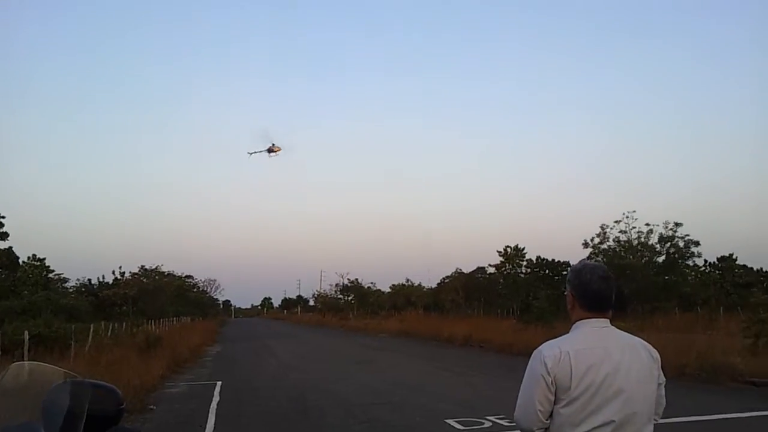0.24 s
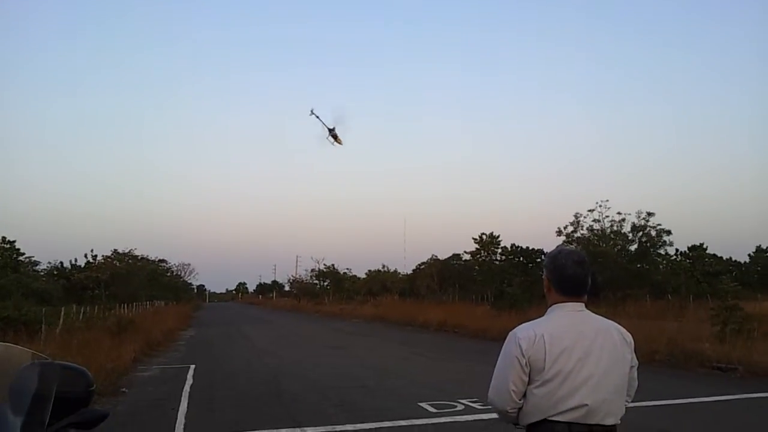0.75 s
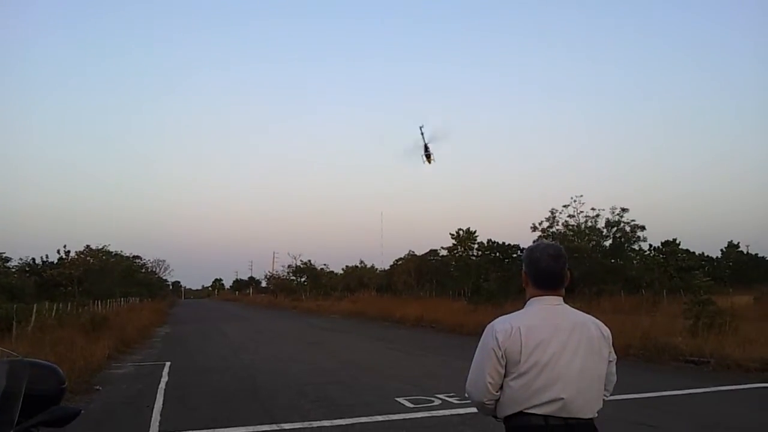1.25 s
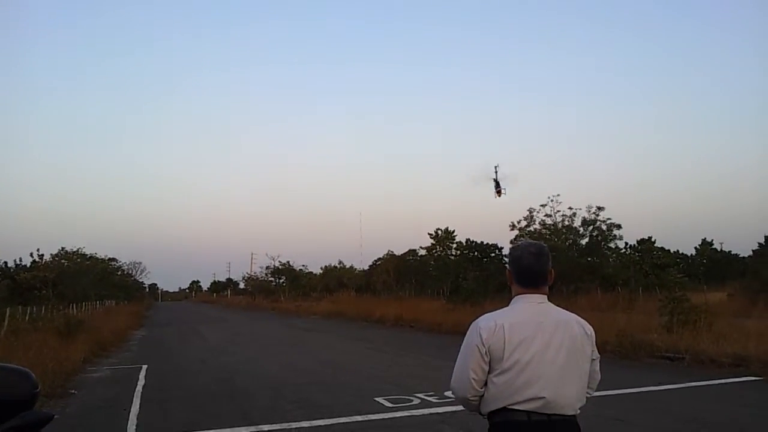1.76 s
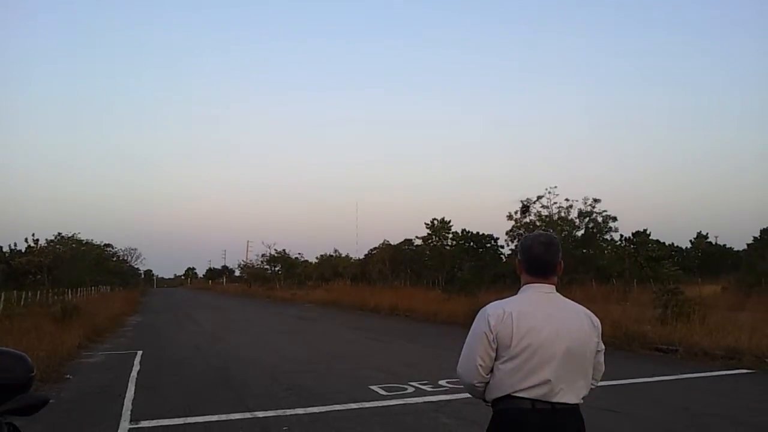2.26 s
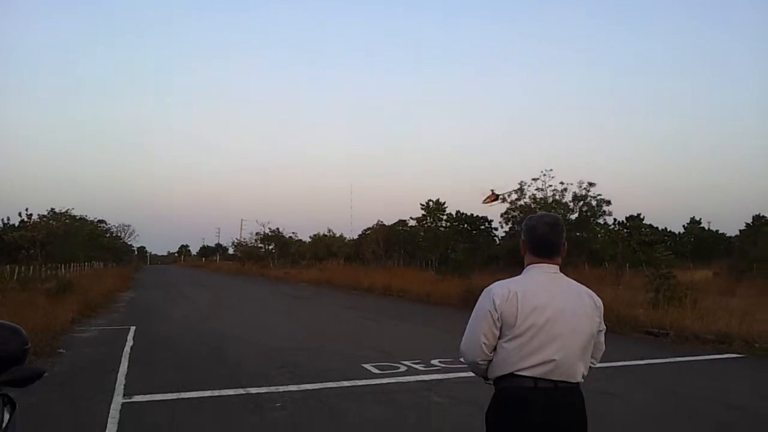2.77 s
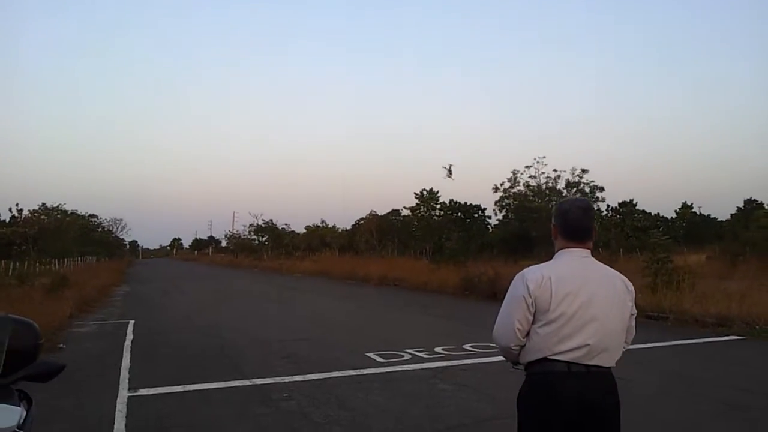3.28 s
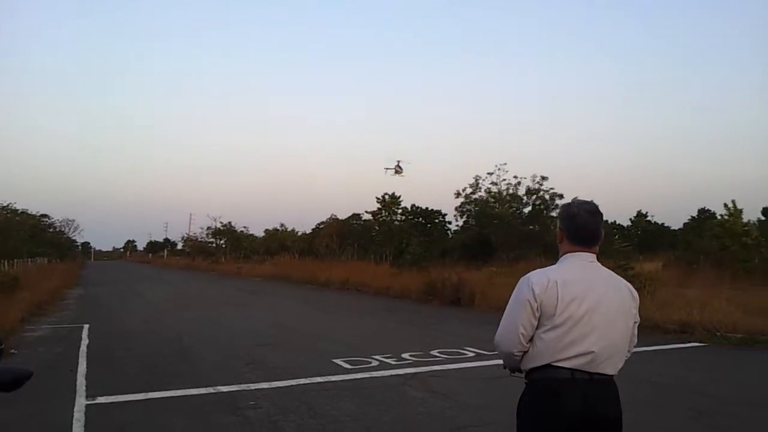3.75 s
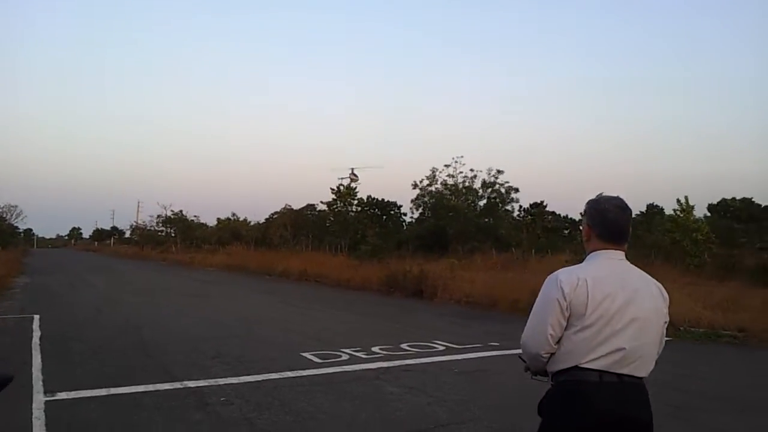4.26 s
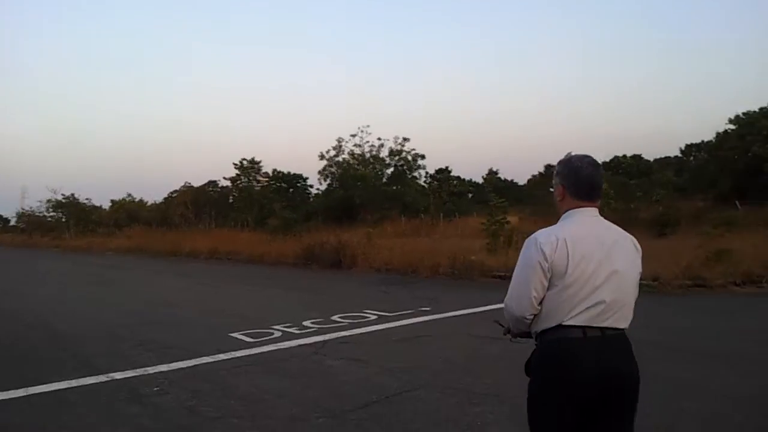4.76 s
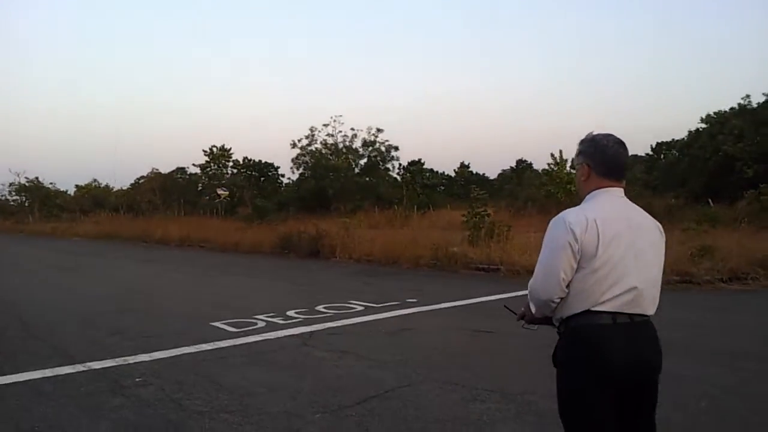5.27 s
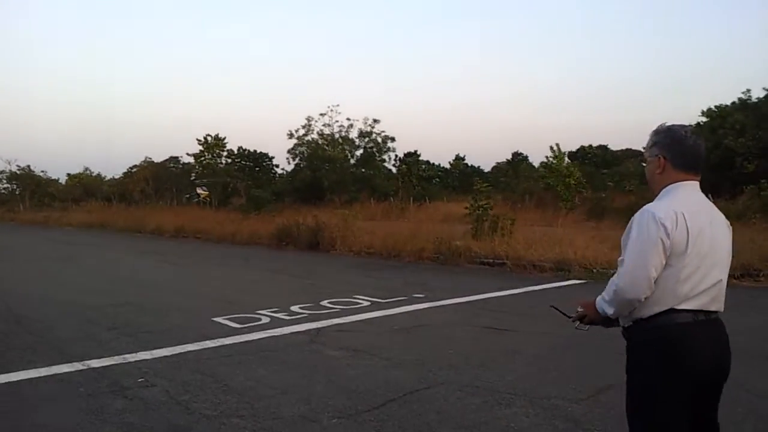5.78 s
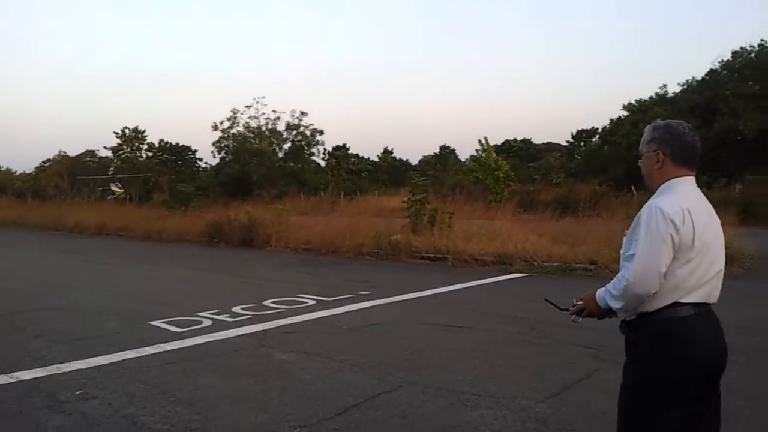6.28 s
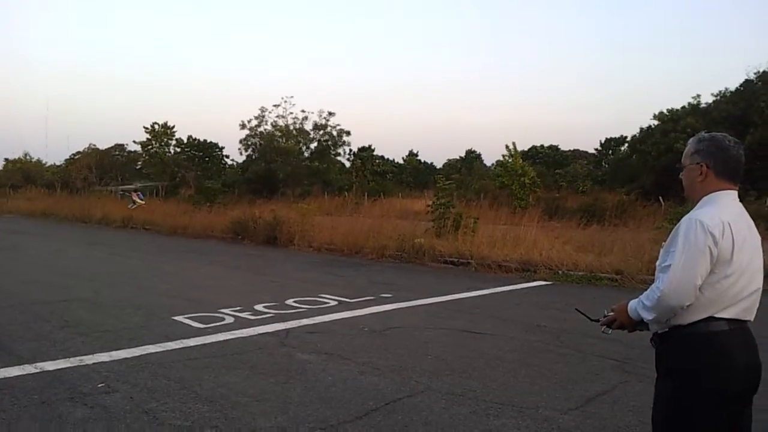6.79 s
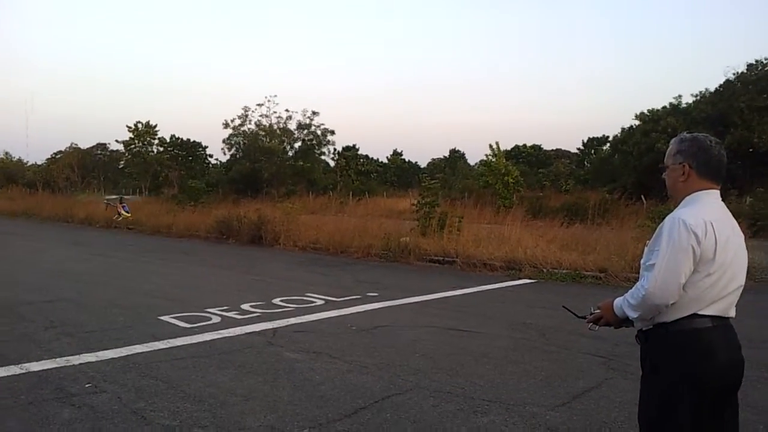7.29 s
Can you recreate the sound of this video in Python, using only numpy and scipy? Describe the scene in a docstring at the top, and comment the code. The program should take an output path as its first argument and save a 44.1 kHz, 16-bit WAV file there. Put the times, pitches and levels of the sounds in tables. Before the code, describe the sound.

A shrill electric motor-gear whine, throbbing rapidly, rides over chopped rotor noise and bright hiss from a small helicopter in flight. Close wind rumbles, thuds and slaps the two microphone ports unequally, distorting in bursts through most of the scene. The whine is strongest around one second, weaker around three and a half, stronger again near six. The last half second is nearly wind-free, in open air with a faint reflection off the ground.

```python
"""Electric model helicopter in gusty air

A small electric helicopter flies some metres off; wind thumps on two unlike microphone ports until they overload.
The main gear whines at its tooth rate and near twice that, as phasors throbbing with each rotor turn.
The tail drive sings lower, as phasors locked to a faster shaft; the blades hum on shaft harmonics and
hiss and chop as pulsed noise. Wind is band noise following gust levels, with sudden slaps and one scuff."""
import sys
import numpy as np
from scipy import signal
from scipy.fft import rfft, irfft, next_fast_len
from scipy.io import wavfile

SR = 44100
rng = np.random.default_rng(int(sys.argv[2]) if len(sys.argv) > 2 else 0)


def output_pcm(signal):
    """Save a mono or channel-first signal as 16-bit PCM at the path in sys.argv[1].

    Samples are clipped to [-1, 1] before scaling.
    """
    pcm = np.clip(np.atleast_2d(signal).T, -1, 1) * 32767
    wavfile.write(sys.argv[1], SR, np.round(pcm).astype(np.int16))


N = 332073

# breeze on the ports: t/s, level/dB, left minus right/dB
BREEZE_CURVE = [(0.02, -13.5, 6), (0.53, -30, 20), (0.76, -15, 13.5), (1.26, -22, -1), (1.32, -12.5, 4),
                (1.5, -4, 8), (1.65, -8, 5), (1.73, -18, 6), (1.87, -17, 17), (2.11, -17, 11),
                (2.3, -24, 18), (2.68, -20, 12), (2.8, -19, 0), (2.86, -11, 4), (2.96, -14, 17),
                (3.0, -34, 12), (3.05, -31, 8), (3.27, -14, 13), (3.56, -5.5, 2.5), (3.75, -20, 33),
                (4.15, -16.5, 8), (4.46, -10.5, 10), (4.66, -18.5, 12), (4.89, -7, 9), (5.02, -12, 3),
                (5.3, -10.5, -8), (5.5, -13.5, 9), (5.66, -30, 9), (5.84, -9.5, -10.5), (6.1, -18.5, 0),
                (6.2, -29.5, -17), (6.34, -4.5, 3), (6.6, -24.5, -5), (7.05, -27, 5), (7.13, -42, 12),
                (7.5, -50, 6)]
# short gusts added to the breeze: t/s, peak level/dB, left minus right/dB
GUST_EVENTS = [(0.98, -12.5, 18), (1.06, -8, 12), (1.16, -9, 7), (1.33, 0, 13), (2.52, -13.5, 23),
               (2.6, -15, -5), (2.715, -11.5, 10), (2.742, -3.5, 7), (2.762, -8, 7), (3.073, -11.5, 29),
               (3.51, -1, 5), (3.67, -9, 24), (3.828, -8.5, 2), (3.973, -1, 6.5), (4.06, -12, 6),
               (4.29, -12.5, 4), (5.139, -2, -6), (5.364, -6.5, 15), (5.501, -3, 26), (5.712, -11.5, -9),
               (6.149, -8, 9), (6.431, -2.5, 14), (6.566, -4, -17), (6.653, -6, -8.5), (6.78, -14.5, 1),
               (6.877, -11.5, 27), (6.999, -12, -5), (7.28, -23, -21)]
GUST_RISE_DB_PER_S, GUST_FALL_DB_PER_S = 343, 411
# gusts that slap a port: t/s, impulse level/dB, left minus right/dB
SLAP_EVENTS = [(1.335, -1, 20), (2.747, -17, -14), (3.274, -17, 21), (3.407, -2.5, 20), (3.469, -5.5, 5),
               (3.489, -4.5, 4), (3.504, 1.5, 17), (3.514, 0.5, 14), (3.956, -13, -13), (3.969, 3.5, 26),
               (4.286, -15.5, 10), (5.142, -1.5, -17), (6.303, -5, -23), (6.312, 2.5, -27), (6.869, -30, 9)]
STEP_DB, STEP_TOP_HZ = 24, 1000   # gain and upper band edge of a slap's pressure step
# a short dry scuff nearby: t/s, half length/s, low f/Hz, high f/Hz, level/dB
SCUFF_EVENT = (6.367, .016, 1800, 2700, -25)

# colour of the microphone ports: f/Hz, left level/dB, right level/dB
PORT_RESPONSE = [(480, -3.5, 0), (855, -0.5, 2.5), (2100, 4.5, 0.5), (2260, 3.5, -1.5), (2600, 2, -5.5),
                 (3780, -7.5, 8), (4320, -26, 8), (4830, 10.5, 6), (5140, -27, 10), (5800, 7, 15),
                 (8080, 8.5, -1), (8600, 5, -1.5), (10150, 4.5, -3), (11220, 18.5, -6), (12530, 8.5, -6),
                 (13030, 0.5, -35), (13950, 3.5, -40)]
LEFT_LAG_S = 0.00009
CUTOFF_HZ = 14400
# echo off the asphalt: t/s, delay/s, strength/(0-1)
GROUND_ECHO = [(0, 0.0025, 0.8), (.4, 0.0029, 0.47), (1.3, 0.003, 0.37), (2.2, 0.002, 0.18),
               (3.2, 0.0017, 0.43), (3.7, 0.00122, 0.4), (6.2, 0.0011, 0.91), (7.53, .0013, 0.05)]
ECHO_CUT_HZ = 5100

# rotor noise: t/s, blade rush level/dB, bright swish level/dB, tick share/(0-1), chop depth/neper
ROTOR_CURVE = [(0.0, -32.5, -30.5, 0, 0.44), (0.5, -25, -29, 0, 0.19), (0.77, -24.5, -20.5, 0, 0.26),
               (1.07, -23.5, -28.5, 0.2, 0.28), (1.55, -23.5, -21, 0, 0.45), (2.12, -37, -27, 0.08, 0.21),
               (3.1, -37, -28.5, 0, 0.2), (3.27, -38.5, -33, 0, 0.13), (4.5, -34, -28, 0.07, 0.5),
               (5.33, -28, -24, 0.13, 0.7), (5.77, -30.5, -25, 0.15, 0.7), (6.04, -33.5, -28, 0.1, 0.26),
               (6.85, -34, -26, 0, 0.18), (7.23, -33.5, -23.5, 0.22, 0.11), (7.53, -31.5, -27.5, 0.05, .2)]
SWISH_CHOP = 0.37   # chop depth of the swish as a fraction of the rush's
# blade pass hum: cycles per rotor turn, relative level/dB
BLADE_HARMONICS = [(2, -4), (8, 0), (10, -6)]

TAIL_RATIO = 3.855   # tail shaft turns per rotor turn
# tail drive: cycles per tail shaft turn, relative level/dB
TAIL_HARMONICS = [(9, -11), (10, -13), (15, -17), (19, -9), (20, 0), (21, -14), (22, -15)]
# tail drive strength: t/s, level/dB
TAIL_LEVEL = [(.1, -57), (.45, -48), (.65, -32), (.86, -52), (1.25, -37), (1.86, -44), (2.3, -38),
              (2.55, -38.5), (2.72, -46.5), (2.95, -34.5), (3.3, -53), (3.55, -36), (3.66, -45),
              (3.85, -36), (4.15, -49), (4.35, -37.5), (4.8, -43.5), (5.0, -45), (5.3, -47), (5.45, -36),
              (5.8, -34), (6.1, -43), (6.25, -52), (6.45, -41), (6.7, -54), (6.95, -44), (7.08, -36),
              (7.25, -37.5), (7.45, -46)]

TEETH = 170   # tooth contacts per rotor turn
# tooth rate of the main gear as heard: t/s, f/Hz
TOOTH_RATE = [(0.03, 5501), (0.3, 5520), (0.5, 5514), (1.0, 5415), (1.25, 5408), (1.6, 5443), (2.0, 5462),
              (2.25, 5513), (2.5, 5517), (2.75, 5489), (3.2, 5458), (3.75, 5327), (4.25, 5333), (4.5, 5364),
              (4.75, 5460), (5.5, 5616), (5.75, 5641), (6.0, 5623), (6.75, 5524), (7.25, 5637), (7.5, 5669)]
# gear whine: t/s, left level/dB, right level/dB
WHINE_LEVEL = [(0.05, -39, -36), (.33, -36, -33), (.43, -31, -20), (.55, -27, -23), (.68, -18, -20),
               (.85, -17, -16), (.95, -20, -13), (1.1, -15, -7), (1.35, -17, -5), (1.47, -16, -14),
               (1.57, -20, -16), (1.65, -24, -13), (1.75, -21, -21), (1.9, -23, -18), (2.05, -24, -21),
               (2.2, -27, -27), (2.33, -33, -27), (2.45, -29, -17), (2.6, -24, -22), (2.68, -17, -10),
               (2.8, -26, -21), (2.95, -34, -29), (3.1, -27, -22), (3.4, -37, -33), (3.55, -36, -26),
               (3.65, -35, -29), (3.85, -29, -22), (4.25, -31, -26), (4.45, -27, -21), (4.7, -29, -25),
               (4.9, -29, -30), (5.2, -28, -25), (5.45, -28, -23), (5.55, -25, -17), (5.9, -19, -14),
               (6.2, -28, -18), (6.5, -28, -25), (6.75, -27, -26), (6.85, -27, -31), (6.95, -26, -26),
               (7.12, -27, -29), (7.25, -23, -21), (7.35, -25, -21), (7.5, -22, -20)]
# octave band of the gear: t/s, level/dB, tonal share/(0-1)
OCTAVE_CURVE = [(.05, -32, .2), (.5, -29, .1), (.7, -19, .15), (1.0, -27, .2), (1.25, -20, .3),
                (1.4, -21, .2), (2.05, -19, .3), (2.15, -22, .35), (2.4, -19, .45), (2.55, -24, .4),
                (2.65, -16, .6), (2.85, -25, .35), (2.95, -19, .5), (3.15, -24, .45), (3.4, -35, .1),
                (3.8, -31, .2), (4.05, -34, .12), (4.6, -27, .17), (4.8, -29, .1), (5.35, -19, .35),
                (5.45, -21, .3), (5.87, -16, .3), (6.25, -26, .35), (6.55, -23, .4), (6.8, -28, .1),
                (7.05, -24, .2), (7.25, -19, .3), (7.5, -18, .45)]
# uneven wheel, side lines of the whine: cycles per rotor turn from the tooth rate, relative level/dB
THROB_LINES = [(-2, -12), (-1, 0), (1, -6), (2, -14)]
# once-a-turn throb: t/s, side line level against the tooth tone/dB
THROB_CURVE = [(.2, 3), (.5, -5), (.7, -9), (1.05, 0), (1.3, -1), (1.6, -6), (2.2, -5), (2.4, -10),
               (3.1, -8), (3.4, 2), (4.45, 0), (4.65, -6), (5.1, -5), (5.4, -9), (6.1, -10), (6.4, -5),
               (6.8, 2), (7.1, -3), (7.3, -15), (7.5, -15)]
# weaker tones below the tooth rate: cycles per rotor turn from it, relative level/dB
LOWER_LINES = [(-16, -9), (-12, 0), (-10, -5), (-7, -8), (-6, -5)]
# weaker tones above the tooth rate: cycles per rotor turn from it, relative level/dB
UPPER_LINES = [(7, -7), (10, -10), (12, 0), (14, -10), (24, -10)]
# strength of these weaker tones: t/s, lower lines level/dB, upper lines level/dB
SIDE_LINE_LEVEL = [(0.1, -45, -61), (.6, -34, -32), (.9, -32, -29), (1.2, -41, -43), (1.7, -27, -31),
                   (1.95, -27.5, -35), (2.1, -34, -41), (2.3, -38, -36.5), (2.75, -52, -43),
                   (3.0, -44, -41), (3.3, -53, -41), (3.6, -35, -51), (4.1, -59, -43), (4.6, -33, -40),
                   (5.2, -36.5, -38), (5.7, -29.5, -38), (6.3, -37, -47), (6.75, -38, -58), (7.2, -35, -46),
                   (7.5, -49, -41)]
# brief flares of the lower and upper lines: t/s, boost/dB
FLARE_EVENTS = [(0.75, 5), (1.45, 5), (2.39, 12), (2.62, 15), (3.05, 4), (3.88, 8), (4.35, 4)]
FLARE_S = 0.069   # half width at 1/e of the dB boost
# octave lines: cycles per rotor turn from twice the tooth rate, relative level/dB
OCTAVE_LINES = [(-24, -16), (-12, -3), (-10, -9), (-6, -8), (0, 0), (1, -8), (6, -9), (12, -2), (18, -9),
                (24, -7)]
# whine phase between the ports: t/s, lag of the whine at the left port/us
WHINE_LAG_CURVE = [(0.1, -10), (0.45, -5), (0.65, -25), (.78, -100), (1.05, -75), (1.3, -90), (1.45, -65),
                   (1.62, -100), (1.75, -150), (1.85, -65), (2.05, -78), (2.2, -130), (2.4, -165),
                   (2.53, -68), (2.8, -55), (3.1, -100), (3.7, -92), (4.0, -70), (4.6, -55), (4.9, 15),
                   (5.05, 8), (5.25, 55), (5.9, 62), (6.2, 74), (6.5, 60), (7.0, 58), (7.1, 150),
                   (7.25, 138), (7.35, 100), (7.5, 103)]
WHINE_LAG_WANDER_US = 5   # spread of the random wander of that lag


def from_db(db):
    """Definition of the decibel: amplitude gain from level."""
    return 10 ** (np.asarray(db) / 20)


def in_time(rows):
    """Linear interpolation: each column of a curve table at every sample."""
    s, *columns = np.transpose(rows)
    return [np.interp(np.arange(N) / SR, s, column) for column in columns]


def drift(rate_hz, channels=1):
    """Low-passed randomness: white noise through two equal poles at rate_hz, spread 1."""
    r = np.exp(-40 * np.pi * rate_hz / SR)   # one slow step is 20 samples
    white = rng.standard_normal((channels, N // 20 + 4002))
    slow = signal.lfilter([1], [1, -2 * r, r * r], white)[:, 4000:]   # without the filter's onset
    slow = slow / slow.std()
    now = np.arange(N) / 20
    return np.array([np.interp(now, np.arange(len(row)), row) for row in slow])


def band(x, low_hz, high_hz):
    """Frequency selection: band-pass, scaled to rms 1."""
    y = signal.sosfilt(signal.butter(2, [low_hz, high_hz], "band", fs=SR, output="sos"), x)
    return y / y.std()


def airy(alike):
    """Partial coherence: stereo white noise with a power share alike common to both ports."""
    common, *own = rng.standard_normal((3, N))
    return np.sqrt(alike) * common + np.sqrt(1 - alike) * np.array(own)


def through_ports(x):
    """Linear filtering: each port has its own colour and the left lags; the mean of both has rms 1."""
    size = next_fast_len(N + 2000)
    hz = np.maximum(np.arange(size // 2 + 1) * SR / size, 1)
    port_hz, *port_db = np.transpose(PORT_RESPONSE)
    colour = from_db([np.interp(np.log(hz), np.log(port_hz), db) for db in port_db])
    lag = np.exp(-2j * np.pi * hz * np.array([[LEFT_LAG_S], [0]]))
    spectrum = rfft(x * np.ones((2, 1)), size)
    y = irfft(spectrum * colour * lag, size)[:, :N]
    return y / y.mean(axis=0).std()


def off_ground(x):
    """Superposition by reflection: the direct sound plus its delayed, duller echo off the ground."""
    delay_s, strength = in_time(GROUND_ECHO)
    now = np.arange(N)
    dull = signal.sosfilt(signal.butter(1, ECHO_CUT_HZ, fs=SR, output="sos"), x)
    echo = np.array([np.interp(now - delay_s * SR, now, row) for row in dull])
    return x + strength * echo


def lines(turns, table, centre, fade_db):
    """Phase locking: phasors tied to a shaft; each line fades and wanders a little at random."""
    fades, wanders = drift(8.1, channels=len(table)), drift(2.9, channels=len(table))
    total = 0
    for (cycles, db), fade, wander in zip(table, fades, wanders):
        phase = 2 * np.pi * (centre + cycles) * turns + 0.6 * wander
        total = total + from_db(db + fade_db * fade) * np.exp(1j * phase)
    return total


def each_turn(turns, sharp):
    """Periodicity of wheel flaws: noise repeating each turn, slowly changing, bunched at one angle by sharp."""
    size = 2048
    spot = np.exp(sharp * np.cos(2 * np.pi * np.arange(size + 1) / size))
    shapes = rng.standard_normal((3, size + 1)) * spot
    where = turns % 1 * size
    weights = drift(3.4, channels=3)
    return sum(weight * np.interp(where, np.arange(size + 1), shape) for weight, shape in zip(weights, shapes))


def on_ports(level_db, pan_db):
    """Conservation of power: a level shared between the ports as two powers."""
    left_share = 1 / (1 + from_db(-2 * pan_db))
    return from_db(2 * level_db) * np.array([left_share, 1 - left_share])


def wind_level():
    """Addition of powers: the breeze plus gusts rising and falling at constant dB rates, as dB at each port."""
    power, t = on_ports(*in_time(BREEZE_CURVE)), np.arange(N) / SR
    for s, peak_db, pan_db in GUST_EVENTS:
        near = slice(int((s - 0.25) * SR), int((s + 0.25) * SR))
        drop_db = np.maximum(GUST_RISE_DB_PER_S * (s - t[near]), GUST_FALL_DB_PER_S * (t[near] - s))
        power[:, near] += on_ports(peak_db - drop_db, np.full(len(drop_db), pan_db))
    return 10 * np.log10(power)


def wind():
    """Turbulence at each port, unrelated left and right: rumble, lumpy thuds, a rasp growing faster than the gust."""
    lumps_db = 0.73 * drift(6.4, channels=2) + 6.1 * drift(59.0, channels=2)
    lumps_db = 9 * np.tanh(lumps_db / 9)   # no eddy towers over the rest
    white = rng.standard_normal((3, 2, N))
    gust_db = wind_level()
    rumble = from_db(0.48 * gust_db - 11.5 + 0.73 * lumps_db) * band(white[0], 30.0, 135.0)
    thuds = from_db(gust_db - 3.0 + lumps_db) * band(white[1], 112.6, 292.4)
    rasp = from_db(1.64 * gust_db - 7.5 + 1.43 * lumps_db) * band(white[2], 285, 440)
    return rumble + thuds + rasp


def slaps():
    """Impulse response: a sudden eddy gives a steep pressure step and a short rough ring, stronger on one port."""
    s, level_db, pan_db = np.transpose(SLAP_EVENTS)
    clicks = np.zeros((2, N))
    clicks[:, (s * SR).astype(int)] = from_db(level_db + np.minimum(0, [pan_db, -pan_db]))
    clicks = clicks + 1e-18   # keeps the filters out of vanishing numbers
    r = np.exp(-1 / (0.01 * SR))   # decays with a time constant of 10 ms
    rising = signal.lfilter([0.05], [1, -0.95], clicks)   # time constant about half a ms
    fading = signal.lfilter([1], [1, -r], rising)
    step = signal.sosfilt(signal.butter(2, [220, STEP_TOP_HZ], "band", fs=SR, output="sos"), clicks)
    ring = fading * band(rng.standard_normal((2, N)), 187, 583)
    return ring - from_db(STEP_DB) * step


def scuff():
    """Amplitude modulation: one soft burst of band noise under a bell-shaped envelope."""
    s, half_s, low_hz, high_hz, db = SCUFF_EVENT
    bell = np.exp(-((np.arange(N) / SR - s) / half_s) ** 2)
    return from_db(db) * bell * band(airy(0.72), low_hz, high_hz)


def blade_passes(turns, chop):
    """Periodic modulation: two blades swell the noise twice a rotor turn, at constant mean power."""
    return np.exp(chop * np.cos(4 * np.pi * turns)) / np.sqrt(np.i0(2 * chop))


def blades(turns, rush_db, swish_db, ticking, chop):
    """Blade-pass noise: a low hum, a rush pulsing at each pass, a bright swish with a tick on every turn."""
    hum = from_db(-38) * lines(turns, BLADE_HARMONICS, 0, fade_db=1.0).real
    rush = blade_passes(turns, chop) * from_db(1.53 * drift(9.9)) * band(airy(0.89), 480, 3080)
    rush = through_ports(off_ground(rush))
    ticks = band(each_turn(turns, sharp=27.0), 6000, 7200)
    swish = blade_passes(turns, SWISH_CHOP * chop) * band(airy(0.044), 2250, 14250)
    swish = np.sqrt(1 - ticking) * swish + np.sqrt(ticking) * ticks
    swish = through_ports(off_ground(swish))
    return hum + from_db(rush_db) * rush + from_db(swish_db + 0.8 * drift(4.3)) * swish


def tail_drive(turns):
    """Gear ratio: the tail shaft turns faster than the rotor and carries its own harmonics."""
    tones = lines(TAIL_RATIO * turns, TAIL_HARMONICS, 0, fade_db=1.5).real
    level_db, = in_time(TAIL_LEVEL)
    return from_db(level_db) * through_ports(tones)


def flares():
    """Level modulation: brief bell-shaped boosts in dB."""
    t = np.arange(N) / SR
    return sum(db * np.exp(-((t - s) / FLARE_S) ** 2) for s, db in FLARE_EVENTS)


def gear_whine(turns, lag_turns, flutter_db):
    """Tooth meshing: a tone at the tooth rate, modulated by an uneven wheel, with faint noise around it."""
    throb_db, = in_time(THROB_CURVE)
    throb = 1 + from_db(throb_db) * lines(turns, THROB_LINES, 0, fade_db=2.8)
    throb = throb / np.sqrt(1 + 1.5 * from_db(2 * throb_db))   # offsets the added power of the side lines
    phase = 2 * np.pi * TEETH * np.array([turns - lag_turns, turns]) + 0.4 * drift(14.0)
    tone = np.sqrt(2) * (throb * np.exp(1j * phase)).real
    noise = from_db(-16) * band(airy(0.2), 5200, 5800)
    return from_db(np.array(in_time(WHINE_LEVEL)) + flutter_db) * (tone + noise)


def gear_octave(turns, flaws, tonal):
    """Second harmonic of meshing: lines about twice the tooth rate, mixed with hiss and wheel flaws."""
    tones = through_ports(lines(turns, OCTAVE_LINES, 2 * TEETH, fade_db=3.0).real)
    hiss = band(flaws, 10000, 13000) + from_db(4) * band(airy(0.2), 10000, 13000)
    return np.sqrt(tonal) * tones + (1 - tonal) * through_ports(hiss)


def main_gear(turns, lag_turns, below_db, above_db):
    """Sidebands of meshing: whine and octave, weaker lines to either side, and tooth rattle beneath."""
    _, right_db = in_time(WHINE_LEVEL)
    octave_db, tonal = in_time(OCTAVE_CURVE)
    flare_db = flares()
    flaws = each_turn(turns, sharp=0.059)
    flutter_db = drift(9.0, channels=2)   # gusty air makes the sound shimmer
    whine = gear_whine(turns, lag_turns, flutter_db[0])
    below = through_ports(lines(turns, LOWER_LINES, TEETH, fade_db=2.5).real)
    above = through_ports(lines(turns, UPPER_LINES, TEETH, fade_db=2.5).real)
    side_lines = from_db(below_db + flare_db) * below + from_db(above_db + flare_db) * above
    rattle = from_db((right_db + octave_db) / 2 - 19) * through_ports(band(flaws, 3840, 5800))
    octave = from_db(octave_db + 2.0 * flutter_db[1]) * gear_octave(turns, flaws, tonal)
    return whine + side_lines + rattle + octave


def scene():
    """Superposition: wind, slaps, scuff and helicopter add at the two ports."""
    tooth_hz, = in_time(TOOTH_RATE)
    turns = np.cumsum(tooth_hz) / SR / TEETH
    whine_lag_us, = in_time(WHINE_LAG_CURVE)
    whine_lag_us = whine_lag_us + WHINE_LAG_WANDER_US * drift(9.6)[0]
    lag_turns = whine_lag_us * 1e-6 * tooth_hz / TEETH
    air = wind() + slaps() + scuff()
    rotor = blades(turns, *in_time(ROTOR_CURVE))
    gear = main_gear(turns, lag_turns, *in_time(SIDE_LINE_LEVEL))
    return air + rotor + tail_drive(turns) + gear


def record(dry):
    """Saturation and band limiting: the input overloads at full scale, then a low-pass cuts the top."""
    clipped = dry / (1 + np.abs(dry) ** 10) ** (1 / 10)
    low_pass = signal.ellip(12, 0.5, 50, CUTOFF_HZ, fs=SR, output="sos")
    return np.clip(signal.sosfilt(low_pass, clipped), -1, 1)


dry = scene()
out = record(dry)
output_pcm(out)
```